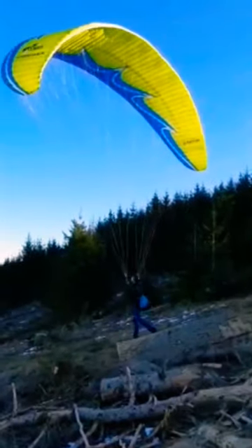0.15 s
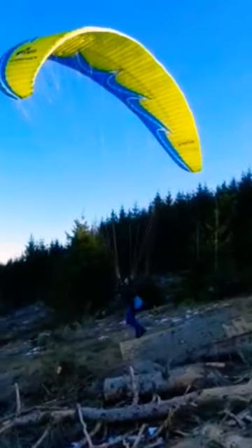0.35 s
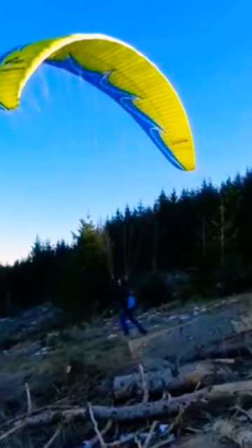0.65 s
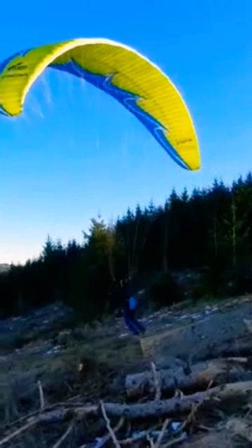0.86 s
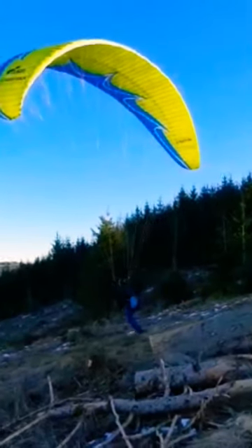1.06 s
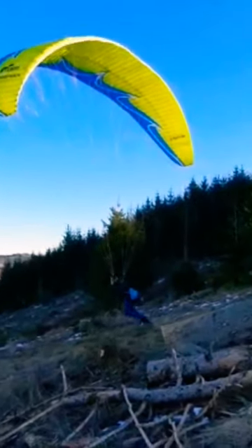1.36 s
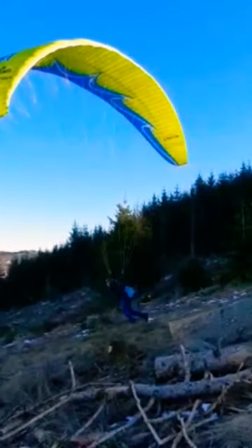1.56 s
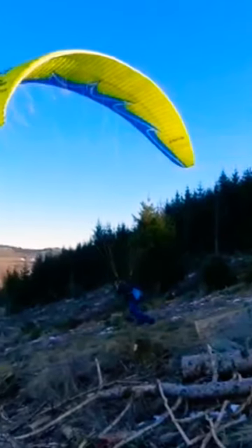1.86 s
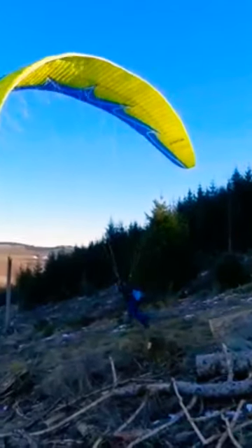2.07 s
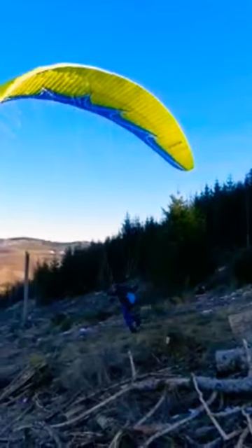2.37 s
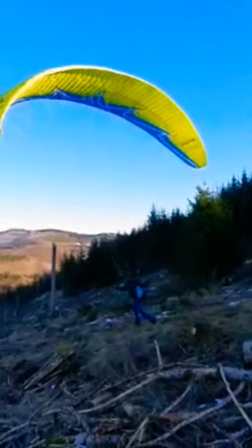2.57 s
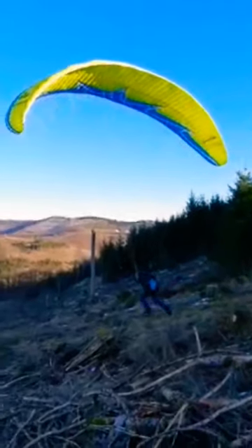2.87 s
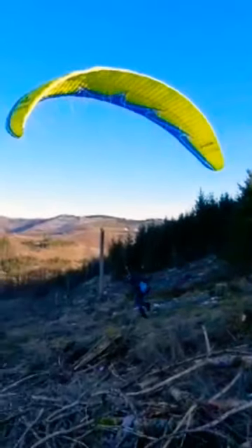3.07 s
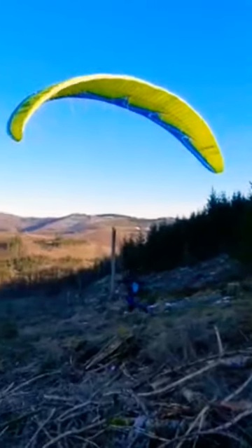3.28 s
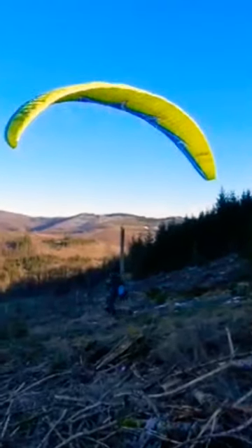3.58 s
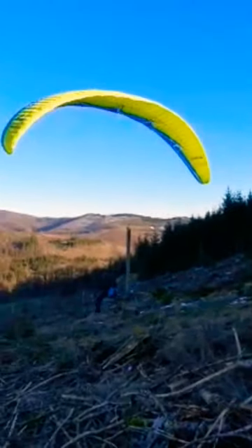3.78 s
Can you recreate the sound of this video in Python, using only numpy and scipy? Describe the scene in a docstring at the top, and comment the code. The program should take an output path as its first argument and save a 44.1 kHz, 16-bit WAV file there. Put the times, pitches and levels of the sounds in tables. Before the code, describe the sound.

Wind buffets an unshielded hand-held stereo microphone outdoors: deep, irregular thumps and low flutter, different in each ear. Strong hits come at the start, around 0.7, 1.25 and 1.9 seconds, with another gust near 2.85, then it eases after 3. Much quieter, grainy fabric and brush swishes lean left, clearer near 0.6, 2.3 and 2.9-3.5. Small dry twig ticks, soft air hiss and a very faint low left drone lie underneath.

```python
"""On a cleared hillside, gusty wind buffets the two microphone ports of a hand-held camera.
The wind is shaped noise that follows a table of gusts, with single eddies as short swings of pressure.
Fabric swishes and brush rustles, mostly on the left, as a paraglider is run down the slope: grainy hiss
and tiny snaps that swell and fade. A few dry twigs tick as short bands of noise, open air hisses softly,
and a faint low drone, a wavering sine, sits in the left port."""
import sys
import numpy as np
from scipy import signal
from scipy.fft import rfft, irfft
from scipy.io import wavfile
from scipy.ndimage import uniform_filter1d

SR = 44100
rng = np.random.default_rng(int(sys.argv[2]) if len(sys.argv) > 2 else 0)


def unload_wav(signal):
    """Save mono or channel-first audio to the path in sys.argv[1] as 16-bit WAV at rate SR, clipped to [-1, 1]."""
    wavfile.write(
        sys.argv[1],
        SR,
        np.round(np.clip(np.atleast_2d(signal).T, -1, 1) * 32767).astype(np.int16),
    )


N = 173754
T = np.arange(N) / SR  # seconds
FREQS = np.fft.rfftfreq(N, 1 / SR)  # Hz

# Colour of the wind's flutter. Each row: frequency in Hz, relative level in dB per Hz.
FLUTTER_COLOUR = [(40, -33), (130, -3), (220, 1.5), (330, 0), (440, -5), (560, -14.5), (720, -25),
                  (1200, -35.5), (3000, -52)]
# Colour of rubbing cloth and brush. Each row: frequency in Hz, relative level in dB per Hz.
CLOTH_COLOUR = [(200, -18), (600, 3), (1000, -6), (1550, -1), (1800, -7), (2100, 1.5), (2550, -3),
                (3200, 2.5), (4200, 2), (5300, 0.5), (7300, -8.5), (8800, -8.5), (13000, -15.5),
                (15700, -22.5)]
# Where cloth and brush lie between the ears. Each row: frequency in Hz, left minus right in dB.
CLOTH_BALANCE = [(500, -20), (1200, 2), (2200, 4.5), (3800, 10), (6000, 11.5), (9000, 9), (13000, 6.5)]


def amp(db):
    """Turns decibels into a gain."""
    return 10 ** (np.asarray(db) / 20)


def unit(x):
    """Scales a sound to an rms of 1."""
    return x / np.sqrt(np.mean(x ** 2) + 1e-20)


def read(points, hz):
    """Reads a table between its rows, along a logarithmic frequency axis."""
    f, value = np.transpose(points)
    return np.interp(np.log(hz + 1), np.log(f + 1), value)


def pan(db):
    """Left and right gains for a level difference in dB, with the same mean power throughout."""
    difference = np.atleast_1d(db)
    gains = amp(np.array([difference, -difference]) / 2)
    return gains / np.sqrt(np.mean(gains ** 2, 0))


def noise(gain):
    """Noise of rms 1, coloured by a gain for each frequency."""
    return unit(irfft(rfft(rng.standard_normal(N)) * gain, N))


def wander(hz):
    """A smooth random curve of rms 1 that drifts at rates up to roughly hz."""
    return noise(np.exp(-(FREQS / hz) ** 2))


def turbulence(colour, steady_s):
    """Lumpy air pressure at two ports, slightly shared, its strength evened out over steady_s."""
    top_hz, lump_db, lump_hz = 2500, 4, 50
    ports_alike = 0.036  # shared part of the power, 0 to 1
    gain = amp(read(colour, FREQS)) / (1 + (FREQS / top_hz) ** 4)
    shared, left, right = [noise(gain) * amp(lump_db * wander(lump_hz)) for _ in range(3)]
    pressure = np.sqrt(ports_alike) * shared + np.sqrt(1 - ports_alike) * np.array([left, right])
    window = np.hanning(int(steady_s * SR))
    window = window[None] / window.sum()
    running_power = abs(signal.fftconvolve(pressure ** 2, window, 'same'))
    return pressure / np.sqrt(running_power + 1e-9)


def hiss(colour, balance, patch_db):
    """Stereo hiss of rms 1, built from random spectra whose colour drifts in patches."""
    # How alike left and right are. Each row: frequency in Hz, likeness from -1 (opposite) to 1 (same).
    likeness = [(500, 0.44), (1300, 0.5), (2500, .4), (4500, 0.19), (9000, 0.076), (15000, -0.18)]
    hz = np.fft.rfftfreq(512, 1 / SR)
    a, b, c, d, patches = rng.standard_normal((N // 128 + 5, len(hz), 5)).T
    patches = uniform_filter1d(patches, size=5, axis=0)  # smooth over frequency
    patches = unit(uniform_filter1d(patches, size=18, axis=1))  # smooth over time
    alike = read(likeness, hz)[:, None]
    left, other = a + 1j * b, c + 1j * d
    spectra = np.array([left, alike * left + np.sqrt(1 - alike ** 2) * other])
    spectra = spectra * amp(read(colour, hz)[:, None] + patch_db * patches)
    spectra = spectra * pan(read(balance, hz))[:, :, None]
    return unit(signal.istft(spectra, nperseg=512, noverlap=384)[1][:, :N])


def open_air():
    """Open air and far brush: a soft, steady hiss with drifting colour."""
    # Colour of the air. Each row: frequency in Hz, relative level in dB per Hz.
    air_colour = [(20, -5), (150, 3.5), (350, 8.5), (750, 1.5), (1100, -2), (1500, -2), (1900, -8.5),
                  (3000, -9.5), (5200, -13), (7300, -22), (12000, -19.5), (15700, -23)]
    # Place of the air between the ears. Each row: frequency in Hz, left minus right in dB.
    air_balance = [(300, -2.5), (1200, 4.5), (3500, 15.5), (8000, 7), (14000, -2)]
    return amp(-65.5) * hiss(air_colour, air_balance, patch_db=3)


def drone():
    """A low sine in the left port only, wavering in pitch and level."""
    # How the drone fades and partly returns. Each row: time in seconds, level in dB.
    drone_level = [(0, -44), (1.1, -48.5), (1.55, -50), (2.0, -60), (2.7, -57), (3.2, -52), (3.6, -54.5),
                   (3.94, -66)]
    centre_hz, waver_hz = 64.3, 4.86  # waver is the rms drift in pitch
    phase = 2 * np.pi * np.cumsum(centre_hz + waver_hz * wander(21.4)) / SR
    tone = unit(np.sin(phase) * amp(0.6 * wander(15)))
    left_only = np.array([[1], [0]])
    return tone * amp(np.interp(T, *np.transpose(drone_level))) * left_only


def twigs():
    """Brief dry scrapes and ticks of twigs and brush: noise in a narrow or wide band, swelling and fading."""
    # Each row: time of the peak in seconds, length in seconds (spread of the bell-shaped swell),
    # level at the peak in dB, middle of the band in Hz, width in octaves, left minus right in dB.
    ticks = [(0.307, 0.15, -74.5, 3120, 0.084, 13), (0.384, 0.011, -62.5, 3200, 0.11, 4),
             (.385, 0.0075, -66, 2060, 0.11, 5), (1.203, 0.046, -68.5, 2870, .19, 7),
             (1.924, 0.018, -70, 1170, .5, 1), (2.097, .007, -58.5, 1000, 0.34, 2),
             (2.12, 0.0051, -66, 2000, 0.35, 3), (2.5, 0.066, -74, 13100, .26, -5),
             (2.5395, 0.0018, -57, 11500, 1, 9), (2.562, 0.0011, -66, 9500, .5, 5),
             (2.62, 0.00079, -67, 9000, 0.87, 4), (2.83, 0.048, -67.5, 1500, 0.18, -1),
             (3.551, 0.052, -68, 1560, .4, 2), (2.901, 0.14, -66.5, 830, 0.3, 0),
             (2.916, .003, -70, 10400, 0.57, 6), (3.307, 0.003, -59, 2250, 0.81, 11),
             (3.39, 0.01, -63, 1290, 0.39, -1), (3.888, 0.0088, -66.5, 9400, 0.23, 21)]
    out, size = np.zeros((2, N)), 8192
    hz = np.fft.rfftfreq(size, 1 / SR) + 1  # 1 Hz added to keep the logarithm finite
    for s, length, db, centre, octaves, pan_db in ticks:
        start = min(int(s * SR) - size // 2, N - size)
        here = slice(start, start + size)
        band = np.exp(-.5 * (np.log2(hz / centre) / octaves) ** 2)
        # separate noise for each side plus a shared part
        raw = rng.standard_normal((2, size)) + rng.standard_normal(size)
        scrape = unit(irfft(rfft(raw) * band))
        swell = np.exp(-.5 * ((T[here] - s) / length) ** 2)
        out[:, here] += scrape * amp(db) * pan(pan_db) * swell
    return out


def crackle():
    """Tiny separate snaps of fibres and dry stalks: single clicks of uneven size, coloured like cloth."""
    snaps_per_s, spread_db = 300, 3
    sizes = amp(spread_db * np.minimum(rng.exponential(1, N), 4))
    happens = rng.random(N) < snaps_per_s / SR
    snaps = rfft(sizes * happens * rng.standard_normal((2, N)))
    coloured = snaps * amp(read(CLOTH_COLOUR, FREQS)) * pan(read(CLOTH_BALANCE, FREQS))
    return amp(-10.5) * unit(irfft(coloured, N))


def fabric():
    """Grainy friction swells and fades with each swish; some are fuller, some have more sheen."""
    # Each row: time of the peak in seconds, rise in seconds, fall in seconds,
    # level in dB before the trim, extra low body in dB, extra high sheen in dB.
    swishes = [(.03, 0.1, 0.15, -67, -2, -0.5), (.29, 0.11, 0.15, -67, 8, -20),
               (.56, 0.039, .055, -58.5, -7, 1.5), (.68, 0.03, 0.073, -58.5, -11, 0.5),
               (.82, 0.054, 0.071, -66.5, 7, 3), (1.201, 0.12, 0.065, -64.5, 10.5, -5),
               (1.51, 0.032, 0.03, -63.5, -1, 9), (1.59, 0.043, 0.044, -65, -14, 4),
               (1.68, .04, 0.033, -65.5, -20, -4), (1.83, 0.046, 0.034, -70.5, 4, 7.5),
               (1.91, 0.066, 0.03, -68, 4, 2), (2.215, .05, 0.047, -77.5, 2, 17),
               (2.32, 0.032, 0.051, -60.5, 4, 4), (2.39, .04, 0.045, -63, 5, -3),
               (2.47, .03, .05, -68.5, -3, 10.5), (2.57, 0.052, 0.073, -67, 5, 5.5),
               (2.81, 0.076, 0.045, -67, 10.5, 2), (2.91, .06, 0.11, -62.5, 4, 3),
               (3.0, 0.018, 0.037, -61.5, 6, -6), (3.11, 0.035, 0.055, -66.5, 3.5, -11),
               (3.31, 0.064, 0.048, -65, 7.5, -0.5), (3.39, 0.039, .05, -63, 4, 3),
               (3.54, 0.085, 0.18, -64, 6, 0.5), (3.78, 0.058, 0.081, -63, 5, -3.5),
               (3.9, 0.017, .06, -66, 8, 7.5)]
    trim_db, patch_db = -3, 1.3
    grain_db, grain_hz = 1.42, 506
    body_hz, sheen_hz = 2220, 6740  # body lies below the first, sheen above the second
    friction = hiss(CLOTH_COLOUR, CLOTH_BALANCE, patch_db) * amp(grain_db * wander(grain_hz))
    rub = rfft(friction + crackle())
    body = 1 / (1 + (FREQS / body_hz) ** 6)
    sheen = 1 - 1 / (1 + (FREQS / sheen_hz) ** 6)
    bands = [body, 1 - body - sheen, sheen]
    power = np.zeros((3, N))
    for s, rise, fall, db, body_db, sheen_db in swishes:
        stroke = np.exp(-((T - s) / np.where(T < s, rise, fall)) ** 2)
        power += amp([[db + body_db], [db], [db + sheen_db]]) ** 2 * stroke
    return amp(trim_db) * sum(irfft(rub * band, N) * np.sqrt(p) for band, p in zip(bands, power))


def eddies():
    """Each eddy is an uneven swing or two of pressure, different at each port, with a puff of flutter."""
    # Each row: time in seconds, peak level in dB before the trim and pan, pitch in Hz.
    strikes = [(.009, -21, 64.8), (0.065, -31, 68.4), (0.221, -32, 74), (0.27, -30.5, 98),
               (.338, -31.5, 67.6), (0.399, -32.5, 73), (0.505, -29.5, 65.3), (0.651, -26, 77),
               (0.683, -32, 219), (0.709, -27, 74), (0.754, -26, 81), (0.821, -26, 78), (0.879, -36, 260),
               (0.917, -30, 70.6), (1.199, -30.5, 76), (1.231, -27.5, 65), (1.253, -21, 85),
               (1.294, -25, 100), (1.306, -28.5, 366), (1.334, -25.5, 65.3), (1.353, -35.5, 75),
               (1.388, -28, 73), (1.667, -37.5, 66), (1.708, -30.5, 116), (1.742, -29.5, 132),
               (1.812, -33.5, 72), (1.837, -28.5, 84), (1.898, -24, 101), (1.928, -26.5, 69.5),
               (2.011, -34.5, 73), (2.057, -31.5, 90.5), (2.064, -30, 234), (2.147, -28.5, 79),
               (2.171, -32, 119), (2.188, -27.5, 65), (2.235, -29, 69.5), (2.305, -31.5, 69.4),
               (2.354, -35.5, 71.4), (2.365, -29.5, 324), (2.467, -31.5, 305), (2.562, -31.5, 71),
               (2.588, -35, 228), (2.603, -29.5, 339), (2.659, -36.5, 81), (2.802, -29.5, 72.5),
               (2.838, -27.5, 74), (2.927, -34, 74), (3.017, -31, 75), (3.108, -30, 75), (3.217, -37, 77.6),
               (3.297, -32.5, 74.4), (3.38, -35, 88), (3.414, -35, 72), (3.515, -37, 71),
               (3.639, -32.5, 129), (3.678, -39, 152), (3.746, -29.5, 63), (3.828, -33, 79.9),
               (3.924, -45, 71.5)]
    trim_db, puff_db, puff_s = -2.5, -16, .01
    spread_cycles, shortest_s = 0.53, 0.00062  # these two set how long the swing lasts
    skew_s, apart_turns = 0.0036, 1  # the most a port is early or late, and the phase spread
    warp_radians, warp = 0.46, [wander(100), wander(120)]  # unevenness of the swing
    out = np.zeros((2, N))
    spray = turbulence(FLUTTER_COLOUR, steady_s=0.095)
    for s, db, hz in strikes:
        turn, *apart = rng.random(3)
        near = abs(T - s) < .05
        spread_s = shortest_s + spread_cycles / hz
        for port in range(2):
            t = T[near] - s - skew_s * (2 * apart[port] - 1)
            turns = t * hz + turn + apart_turns * apart[port]
            swing = np.cos(2 * np.pi * turns + warp_radians * warp[port][near])
            swing = swing * np.exp(-.5 * (t / spread_s) ** 2)
            puff = amp(puff_db) * spray[port, near] * np.exp(-.5 * (t / puff_s) ** 2)
            out[port, near] += amp(db + trim_db) * (swing + puff)
    return out * pan(db=1.5)


def wind():
    """Turbulent air presses on the ports: rumble and flutter follow the gusts and buffet together."""
    # Each row: time in seconds, flutter level in dB, rumble level in dB, both before their trims.
    gusts = [(0.02, -54, -38), (0.14, -62, -47), (0.22, -44, -44.5), (0.48, -52.5, -44), (0.5, -68.5, -31),
             (0.58, -46.5, -45.5), (0.64, -52.5, -37), (0.93, -43.5, -38.5), (0.95, -59.5, -47.5),
             (1.15, -56.5, -44.5), (1.25, -56, -33), (1.48, -58.5, -59), (1.51, -47, -36.5),
             (1.57, -67.5, -54), (1.65, -52, -40), (1.92, -43.5, -36.5), (1.97, -62, -66), (2.06, -45, -43),
             (2.08, -45, -41), (2.17, -62, -38), (2.28, -65, -56), (2.37, -47.5, -36.5), (2.42, -57.5, -52),
             (2.46, -58, -35), (2.52, -64, -49), (2.56, -66, -50), (2.6, -65, -46), (2.65, -55, -40.5),
             (2.74, -55, -52.5), (2.84, -47.5, -31), (2.88, -52, -57), (3.02, -48, -33.5),
             (3.05, -57.5, -45), (3.62, -65, -51), (3.63, -54, -40), (3.94, -59, -47.5)]
    # Colour of the rumble. Each row: frequency in Hz, relative level in dB per Hz.
    rumble_colour = [(12, -13), (22, -13.5), (45, 2.5), (75, -1), (110, -4), (170, -12.5), (300, -38),
                     (700, -60), (2000, -56)]
    # How the rumble moves between the ports. Each row: time in seconds, left minus right in dB.
    rumble_balance = [(0, 9.5), (.15, 20), (.45, 1.5), (.7, -9), (.9, 7.5), (1.05, 16), (1.25, -1),
                      (1.4, 8), (1.52, 28), (1.65, -7), (2, 7), (2.45, 4.5), (2.7, 1), (3.1, 0.5),
                      (3.5, -9), (3.94, 1)]
    rumble_trim_db, flutter_trim_db = -2.5, -0.5
    buffet_db, buffet_hz = 3, 20
    s, flutter_db, rumble_db = np.transpose(gusts)
    rumble = turbulence(rumble_colour, steady_s=0.23)
    rumble = rumble * amp(np.interp(T, s, rumble_db) + rumble_trim_db)
    rumble = rumble * pan(np.interp(T, *np.transpose(rumble_balance)))
    flutter = turbulence(FLUTTER_COLOUR, steady_s=0.082)
    flutter = flutter * amp(np.interp(T, s, flutter_db) + flutter_trim_db) * pan(-2.5)
    return (rumble + flutter) * amp(buffet_db * np.tanh(wander(buffet_hz)))


def scene():
    """Wind on the ports over the rustle, the drone and the open air."""
    return open_air() + drone() + twigs() + fabric() + eddies() + wind()


def record(dry):
    """The recorder's band limit: a steep low-pass filter at 15750 Hz."""
    low_pass = signal.firwin(1023, 15750, window=("kaiser", 9), fs=SR)
    return signal.oaconvolve(dry, low_pass[None], "same")


dry = scene()
out = record(dry)
unload_wav(out)
```